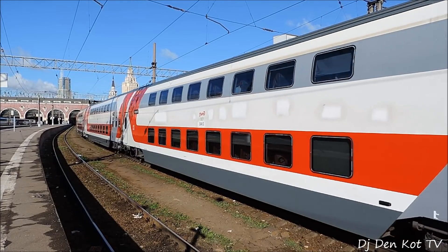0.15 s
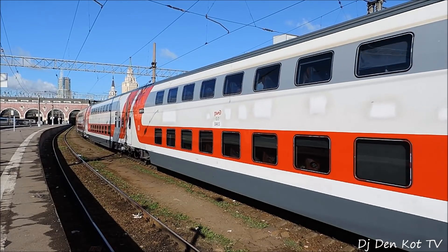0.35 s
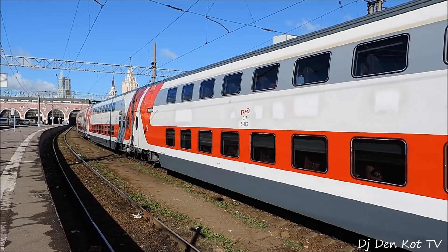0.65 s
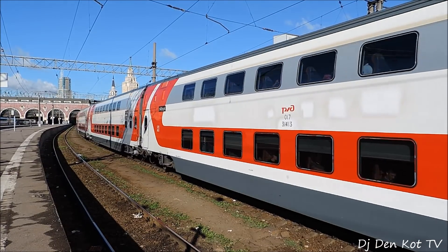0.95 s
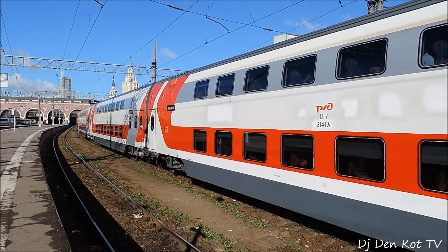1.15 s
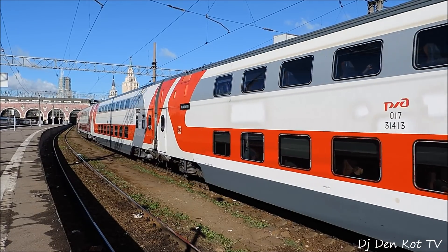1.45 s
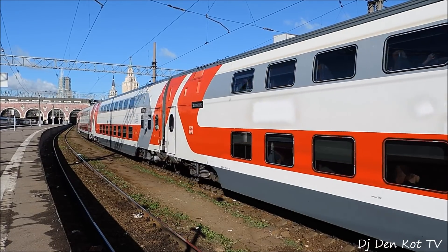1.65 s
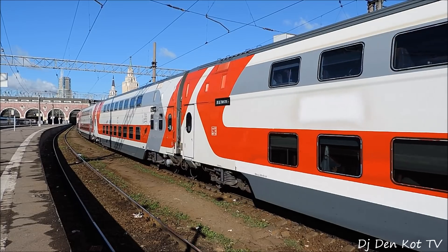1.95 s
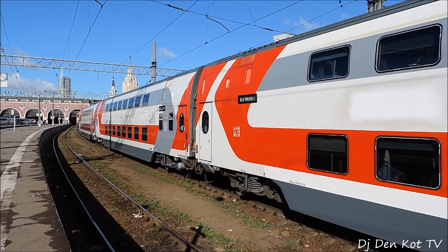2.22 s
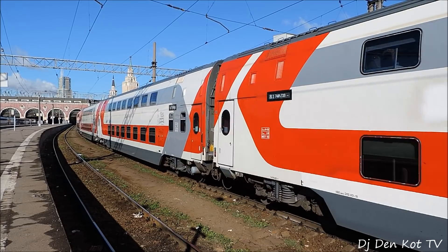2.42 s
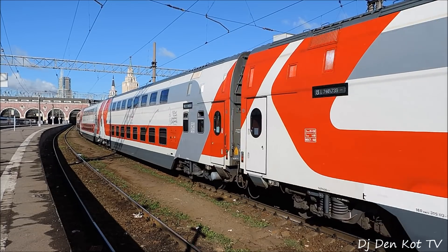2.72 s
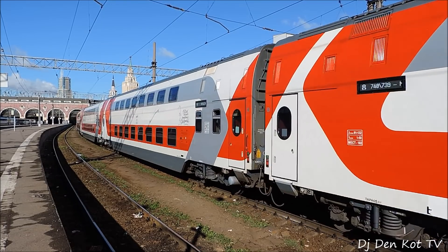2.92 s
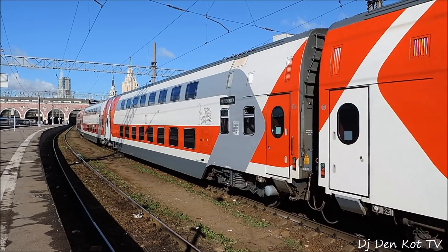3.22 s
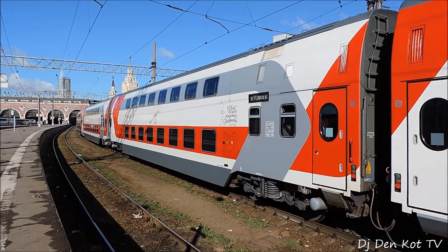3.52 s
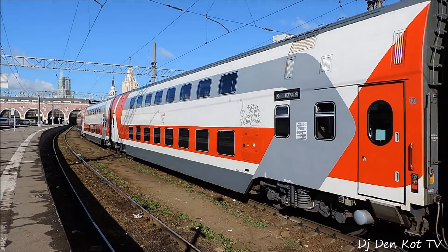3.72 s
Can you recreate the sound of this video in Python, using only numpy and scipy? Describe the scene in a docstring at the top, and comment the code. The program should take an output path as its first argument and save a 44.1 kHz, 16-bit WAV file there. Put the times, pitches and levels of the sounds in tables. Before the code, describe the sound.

Train coaches roll slowly past with a low rumble and swelling wheel noise. Wheels bang over a close rail joint at 0.4 and 0.8 seconds, the second with a short scrape. Softer, ringing clatters follow at 1.5, 1.9, 2.7 and 3.1, with brief grinding near 2.5. Faint squeals and a thin electrical whine come late, with another close bang at 3.5. Light wind occasionally bumps the microphone.

```python
"""On a station platform, double-deck coaches roll slowly past over a low rumble and the hum of wheels.
Impact excitation: axles bang over a rail joint close by and clatter over a second one further along,
and wheels and rail ring on in free vibration. Rail roughness drives the rolling noise; friction makes
the wheels scrape, grind and briefly sing on the curve. Wind bumps the left microphone port, and the
thin whine of a power converter arrives with the end of the coach."""
import sys
import numpy as np
from scipy import signal
from scipy.fft import rfft, irfft, next_fast_len
from scipy.io import wavfile

SR = 44100
rng = np.random.default_rng(int(sys.argv[2]) if len(sys.argv) > 2 else 0)


def transcribe(u):
    """Save the signal u as a 16-bit wav file named by the first command-line argument.

    u: samples, shape (n,) or (channels, n), limited to [-1, 1]; the rate is SR.
    q: integer samples, one column per channel.
    """
    v = np.clip(np.atleast_2d(u).T, -1, 1)
    q = np.round(v * 32767).astype(np.int16)
    wavfile.write(sys.argv[1], SR, q)


N = 169785
T = np.arange(N) / SR
HIT_T = T[:SR]  # time axis of one short event

# axles on the near joint:
# (time [s], thud level [dB], thud centre [Hz], off-centre loss [dB], crack level [dB], ring level [dB])
NEAR_AXLES = [(0.420, -2.5, 228, 7, -15.5, -32), (0.833, -5.5, 360, 9, -17, -29),
              (3.532, -2.5, 259, 14, -15, -34)]
# bogie and sleeper modes: (frequency [Hz], relative level [dB], decay time T60 [s])
BOGIE_MODES = [(59.5, -5.5, 0.22), (107, -6.5, 0.13), (226.7, -.5, 0.085), (295.4, -6.5, 0.19),
               (367, -8, 0.11), (476.7, -4.5, .14)]
# crack of steel on steel: (frequency [Hz], gain [dB])
CRACK_SPECTRUM = [(100, -8), (250, 4.5), (450, 7), (620, -3), (900, 3.5), (1200, -6.5), (1700, 1.5),
                  (2200, -11.5), (3000, -10), (5500, -33), (13000, -44)]
# clang of the rail end: (frequency [Hz], level re crack [dB], decay time T60 [s])
RAIL_END_MODES = [(815, -7, 0.046), (1600, -11.5, 0.21), (1766, -8, 0.097)]
# a wheel flange scrapes the rail after the second bang: (time [s], level [dB])
FLANGE_SCRAPES = [(.835, -29), (1.07, -48.5)]
# flange friction: (frequency [Hz], gain [dB])
SCRAPE_SPECTRUM = [(500, -32), (1500, 10), (3300, 4.5), (6000, -10), (10000, -16.5), (13200, -28)]

# axles on the far joint: (time [s], clatter level [dB], rise time [s], snap level [dB], ring level [dB])
FAR_AXLES = [(1.501, -17.5, 0.0014, -32, -33.5), (1.908, -18, 0.011, -40, -27),
             (2.687, -15.5, 0.0017, -31, -30), (3.092, -17, 0.0082, -41.5, -32)]
# a wheel leaves one rail end, lands on the next and bounces: (delay [s], snap gain [dB], blow gain [dB])
WHEEL_CONTACTS = [(0, -1, -4), (0.017, -3, 0), (0.036, -10, -13)]
# rattling rail: (frequency [Hz], gain [dB])
CLATTER_SPECTRUM = [(60, -23.5), (190, -5), (320, 0), (480, -3), (660, -13), (900, -5.5), (1150, -15.5),
                    (1500, -5.5), (1850, -18.5), (2300, -11.5), (4000, -30.5), (6000, -43.5),
                    (14000, -45.5)]
# its resonances: (frequency [Hz], bandwidth [Hz], lift [dB])
CLATTER_RESONANCES = [(352, 120, 7), (795, 72, 8.5), (1033, 150, 9), (1585, 33, 7), (2170, 230, 5)]
# bright tick of each contact: (frequency [Hz], gain [dB])
TICK_SPECTRUM = [(4000, 3), (7000, 2.5), (9000, -3.5), (11500, 2), (13200, -5)]

# rail ringing after a blow: (frequency [Hz], gain [dB])
RING_SPECTRUM = [(80, -17), (230, 3.5), (400, -3), (620, -1.5), (1000, -12), (2200, -16), (3500, -21.5),
                 (13000, -42)]
# wheel and rail resonances: (frequency [Hz], bandwidth [Hz], lift [dB])
WHEEL_RESONANCES = [(248.7, 21, 3.5), (384, 49, 4.5), (857, 23, 2), (976.5, 46, 8), (1573, 156, 6.5),
                    (2052, 51, 9.5), (2644, 18, 9), (2810, 39, 4.5), (3380, 32, 6)]
# modes of the steel wheel: (frequency [Hz], level re ring [dB], decay time T60 [s])
STEEL_MODES = [(2026, -19, 0.71), (2220, -15.5, 1), (2950, -17, 0.91), (3540, -18, 0.37)]

# rolling roar, swelling as bogies pass: (time [s], level [dB])
ROAR_LEVELS = [(0, -37), (.15, -32.5), (.35, -25), (.55, -29.5), (.76, -28.5), (1.05, -36), (1.3, -31.5),
               (1.65, -29.5), (1.85, -33), (2.08, -24.5), (2.3, -28), (2.47, -22), (2.6, -27), (2.72, -29),
               (2.85, -25.5), (3.03, -33), (3.3, -28), (3.6, -31), (3.85, -31)]
# rolling roar: (frequency [Hz], gain [dB])
ROAR_SPECTRUM = [(50, 5), (130, 1.5), (300, 0), (450, -2), (600, -8), (850, -9), (1150, -16), (1700, -24.5),
                 (2500, -21.5), (4000, -44.5), (8000, -73.5)]
# rolling hiss: (time [s], level [dB])
HISS_LEVELS = [(0, -43.5), (.33, -36.5), (.75, -39), (1.1, -41), (1.35, -42.5), (1.6, -40), (1.83, -45),
               (2.2, -42), (2.5, -35), (2.8, -42), (3.03, -43), (3.3, -39), (3.65, -38.5), (3.85, -42.5)]
# rolling hiss: (frequency [Hz], gain [dB])
HISS_SPECTRUM = [(600, -2.5), (1500, 5.5), (2500, -1.5), (3500, -6.5), (5500, -16.5), (8000, -24.5),
                 (13200, -28)]
# rumble of coach and ground: (time [s], level [dB])
RUMBLE_LEVELS = [(0, -45.5), (.3, -28), (.8, -38.5), (1.1, -43), (1.5, -32), (2, -36.5), (2.5, -31.5),
                 (3, -37.5), (3.3, -33.5), (3.85, -41)]
# rumble of coach and ground: (frequency [Hz], gain [dB])
RUMBLE_SPECTRUM = [(15, 0), (30, -7.5), (48, 7.5), (70, 4.5), (110, 2.5), (200, -27.5), (500, -51)]
# bogie grinding along the curve: (frequency [Hz], gain [dB])
GRIND_SPECTRUM = [(500, -20), (880, 5), (2100, -3), (4000, -37)]
# wheels singing on the curve: (time [s], frequency [Hz], level [dB], width [s])
SQUEALS = [(2.87, 4813, -55, 0.028), (3.22, 2080, -42, .055), (3.59, 4800, -50, 0.037),
           (3.625, 3340, -47, 0.02), (3.655, 2640, -45, 0.0198)]
# small knocks in the running gear: (time [s], level [dB])
GEAR_KNOCKS = [(1.088, -24), (2.412, -15), (2.656, -14.5), (3.79, -21.5)]

# wind bumps on the left port: (time [s], level [dB], width [s])
WIND_BUMPS = [(0.401, -15, 0.0075), (1.344, -23, .006), (1.421, -14, 0.0098), (2.44, -22.5, 0.026),
              (2.53, -13, .016), (2.666, -16.5, .014)]
# wind pressure at the port: (frequency [Hz], gain [dB])
WIND_SPECTRUM = [(20, -12), (70, -0.5), (140, 7), (230, 0.5), (400, -8.5), (900, -35), (3000, -70)]
# tones of the power converter: (frequency [Hz], level [dB])
CONVERTER_TONES = [(10164, -68.5), (15275, -63)]
# their rise and fall as the coach passes: (time [s], gain [dB])
CONVERTER_GAINS = [(2.1, -40), (2.35, -8), (2.65, -3), (2.78, -15), (2.88, 0), (3.08, 2), (3.25, -6),
                   (3.65, 6)]
# diffuse side signal against the mid signal: (frequency [Hz], level difference [dB])
SIDE_RE_MID = [(120, -8), (260, -23), (500, -23), (1000, -9), (2000, -8.5), (4000, -1)]
# left channel against the right: (frequency [Hz], level difference [dB])
LEFT_RE_RIGHT = [(300, 0), (1000, -.5), (2200, -2.5), (12000, -2)]

THUD_ATTACK_S, CRACK_ATTACK_S, CRACK_DELAY_S = .0022, .0012, .002
LEFT_LAG_S = .00013  # the train is on the right
RIPPLE_SPACING_HZ, RIPPLE_FULL_HZ = 70.1, 1330  # fine random ripple gives the treble a metallic colour
NOISE_TOP_HZ, ROLLOFF_DB_PER_HZ = 13500, .05


def near_joint():
    """Impact excitation: each axle strikes the joint with a thud, a steel crack, a clang and a ring."""
    out = np.zeros((2, N))
    for time, thud_db, centre_hz, loss_db, crack_db, ring_db in NEAR_AXLES:
        blow = burst(crack_db, CRACK_ATTACK_S, t60=.13, hold=.0064)
        crack = shaken(blow, CRACK_SPECTRUM, ripple_db=-1.5)
        clang = sum(mode(hz, crack_db + db, CRACK_ATTACK_S, t60) for hz, db, t60 in RAIL_END_MODES)
        add(out, time, thud(thud_db, centre_hz, loss_db))
        add(out, time + CRACK_DELAY_S, crack + clang + ring(ring_db))
    return out


def thud(db, centre_hz, loss_db, focus_octaves=.24):
    """Modal superposition: a blow excites bogie and sleeper, most strongly near its centre frequency."""
    out = 0
    for k, (hz, mode_db, t60) in enumerate(BOGIE_MODES):
        closeness = np.exp(-(np.log2(hz / centre_hz) / focus_octaves) ** 2)
        level_db = db + mode_db - loss_db * (1 - closeness)
        out += (-1) ** k * mode(hz, level_db, THUD_ATTACK_S, t60)
    return out


def far_joint(sizzle_re_clatter_db=-23.5):
    """Repeated impact: each contact of a bouncing wheel ticks and rattles the rail, which rings out."""
    out = np.zeros((2, N))
    for time, db, rise, snap_db, ring_db in FAR_AXLES:
        ticks, blows = [], []
        for delay, snap_gain_db, blow_gain_db in WHEEL_CONTACTS:
            blow_db = db + blow_gain_db
            snap = burst(snap_db + snap_gain_db, rise, t60=.035)
            sizzle = burst(blow_db + sizzle_re_clatter_db, rise, t60=.16)
            blow = burst(blow_db, max(rise, THUD_ATTACK_S), t60=.24, hold=.0062)
            ticks += [delayed(snap, delay), delayed(sizzle, delay)]
            blows.append(delayed(blow, delay))
        # incoherent contacts add in power
        tick = shaken(np.linalg.norm(ticks, axis=0), TICK_SPECTRUM)
        rattle = shaken(np.linalg.norm(blows, axis=0), CLATTER_SPECTRUM, CLATTER_RESONANCES,
                        rough_db=2.5, rough_hz=162.3, ripple_db=3)
        add(out, time, tick + rattle + ring(ring_db))
    return out


def ring(db, spread_db=2.5):
    """Free vibration: the struck rail rings on, with the pure modes of the wheel on top."""
    out = shaken(burst(db, attack=.017, t60=1), RING_SPECTRUM, WHEEL_RESONANCES, ripple_db=3)
    for hz, mode_db, t60 in STEEL_MODES:
        level_db = db + mode_db + spread_db * rng.standard_normal()
        out += mode(hz, level_db, THUD_ATTACK_S, t60, phase_cycles=rng.random((2, 1)))
    return out


def flange_scrape():
    """Sliding friction: a wheel flange drags along the rail with a rough, bright noise."""
    out = np.zeros((2, N))
    for time, db in FLANGE_SCRAPES:
        drag = burst(db, attack=.004, t60=.41, hold=.055)
        add(out, time, shaken(drag, SCRAPE_SPECTRUM, rough_db=-3, rough_hz=147, ripple_db=3.5))
    return out


def rolling():
    """Roughness excitation: the uneven rail shakes the wheels, the coach and the ground."""
    roar = shaken(gain_curve(ROAR_LEVELS), ROAR_SPECTRUM, WHEEL_RESONANCES, rough_db=.5, rough_hz=25.2)
    hiss = shaken(gain_curve(HISS_LEVELS), HISS_SPECTRUM, WHEEL_RESONANCES,
                  rough_db=1.53, rough_hz=25.2, ripple_db=1.5)
    rumble = shaken(gain_curve(RUMBLE_LEVELS), RUMBLE_SPECTRUM)
    return roar + hiss + rumble


def curve_friction(grind_time=2.48, grind_db=-34, grind_width=.075):
    """Friction on the curve: the nearest bogie grinds past, and wheels sing in brief pure tones."""
    out = np.zeros((2, N))
    grind = shaken(swell(grind_db, grind_width), GRIND_SPECTRUM, rough_db=3, rough_hz=69.5)
    add(out, grind_time - 3 * grind_width, grind)
    quadrature = np.array([[0], [np.pi / 2]])
    for time, hz, db, width in SQUEALS:
        tone = np.sin(2 * np.pi * hz * HIT_T + quadrature)
        add(out, time - 3 * width, swell(db, width) * tone)
    return out


def running_gear():
    """Light impacts: small knocks excite the low modes of the bogie."""
    out = np.zeros((2, N))
    for time, db in GEAR_KNOCKS:
        add(out, time, thud(db, centre_hz=344, loss_db=7.5))
    return out


def wind(floor_db=-39):
    """Turbulent pressure: light buffeting and a few stronger bumps, on the left port only."""
    out = shaken(np.full(N, from_db(floor_db)), WIND_SPECTRUM, rough_db=8, rough_hz=9.3)
    for time, db, width in WIND_BUMPS:
        add(out, time - 3 * width, shaken(swell(db, width), WIND_SPECTRUM))
    return out * [[1], [0]]


def converter_whine(wander_hz=28):
    """Frequency modulation: two thin tones of the power converter waver, differently at each ear."""
    out = np.zeros((2, N))
    for channel in out:
        for hz, db in CONVERTER_TONES:
            phase = 2 * np.pi * np.cumsum(hz + wander_hz * drift(30)) / SR
            channel += from_db(db) * np.sin(phase)
    return out * gain_curve(CONVERTER_GAINS)


def shaken(envelope, spectrum, resonances=(), rough_db=0, rough_hz=50, ripple_db=0):
    """Source and filter: uneven random forces drive a resonant body; stereo, at the envelope's power."""
    n = len(envelope)
    size = 2 * next_fast_len(n // 2 + SR // 10)
    hz = np.fft.rfftfreq(size, 1 / SR)
    body_db = at_hz(spectrum, hz)
    body_db += sum(lift / (1 + (2 * (hz - centre) / width) ** 2) for centre, width, lift in resonances)
    ripple = np.interp(hz / RIPPLE_SPACING_HZ, np.arange(len(hz)), rng.standard_normal(len(hz)))
    body_db += ripple_db * ripple * np.minimum(hz / RIPPLE_FULL_HZ, 1)
    body_db -= np.clip((hz - NOISE_TOP_HZ) * ROLLOFF_DB_PER_HZ, 0, 30)
    force = rng.standard_normal((2, n)) * envelope * from_db(rough_db * drift(rough_hz, size=n))
    mid, side = rfft(force, size) * minimum_phase(body_db)
    side_gain = from_db(at_hz(SIDE_RE_MID, hz))
    balance = from_db(at_hz(LEFT_RE_RIGHT, hz) / 2)
    left = (mid + side_gain * side) * balance * np.exp(-2j * np.pi * hz * LEFT_LAG_S)
    right = (mid - side_gain * side) / balance
    out = irfft(np.array([left, right]) / np.hypot(1, side_gain))[:, :n]
    return out * np.sqrt(np.mean(envelope ** 2) / np.mean(out ** 2))


def minimum_phase(db):
    """Causality: folding the cepstrum gives a response with these gains that never precedes its cause."""
    cepstrum = irfft(np.log(from_db(db)))
    half = len(cepstrum) // 2
    cepstrum[1:half] *= 2
    cepstrum[half + 1:] = 0
    return np.exp(rfft(cepstrum))


def mode(hz, db, attack, t60, phase_cycles=0):
    """Damped oscillation of a single mode."""
    return burst(db, attack, t60) * np.sin(2 * np.pi * (hz * HIT_T + phase_cycles))


def burst(db, attack, t60, hold=0):
    """Exponential decay, by 60 dB in t60 seconds, after a linear attack and a hold."""
    decay = np.exp(-np.log(1000) * np.maximum(HIT_T - attack - hold, 0) / t60)
    return from_db(db) * np.minimum(HIT_T / attack, 1) * decay


def swell(db, width):
    """Gaussian envelope that peaks three widths in."""
    return from_db(db) * np.exp(-(HIT_T / width - 3) ** 2 / 2)


def drift(rate_hz, size=N):
    """Random modulation, mostly below rate_hz: straight lines between unit normal values."""
    knots = rng.standard_normal(size)
    return np.interp(T[:size] * rate_hz * 2, np.arange(size), knots)


def from_db(db):
    """Amplitude ratio of a level in decibels."""
    return 10 ** (np.asarray(db) / 20)


def gain_curve(levels):
    """Interpolation of levels over time, as amplitude."""
    return from_db(np.interp(T, *np.transpose(levels)))


def at_hz(spectrum, hz):
    """Interpolation of a spectrum on a log-frequency axis."""
    frequencies, db = np.transpose(spectrum)
    return np.interp(np.log(hz + 1), np.log(frequencies), db)


def delayed(envelope, delay):
    """Time shift of an envelope, in seconds."""
    return np.interp(HIT_T - delay, HIT_T, envelope, left=0)


def add(out, time, sound):
    """Superposition of a sound on the mix, from the given time."""
    start = int(time * SR)
    out[:, start:start + sound.shape[-1]] += sound[..., :N - start]


def scene():
    """Linear superposition of all sources at the platform."""
    joints = near_joint() + flange_scrape() + far_joint()
    return joints + rolling() + curve_friction() + running_gear() + wind() + converter_whine()


def record(dry):
    """Soft saturation rounds the highest peaks, and a low-pass filter cuts the top."""
    ceiling, hardness, cutoff_hz = .93, 6, 15840
    rounded = dry / (1 + np.abs(dry / ceiling) ** hardness) ** (1 / hardness)
    lowpass = signal.ellip(10, .1, 80, cutoff_hz, fs=SR, output="sos")
    return signal.sosfilt(lowpass, rounded)


dry = scene()
out = record(dry)
transcribe(out)
```